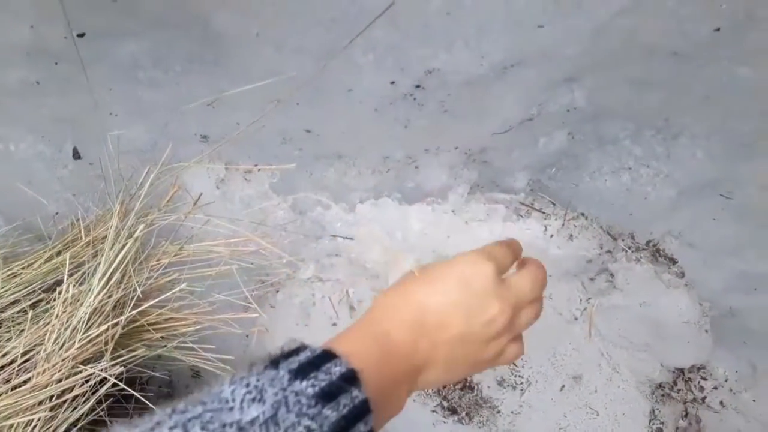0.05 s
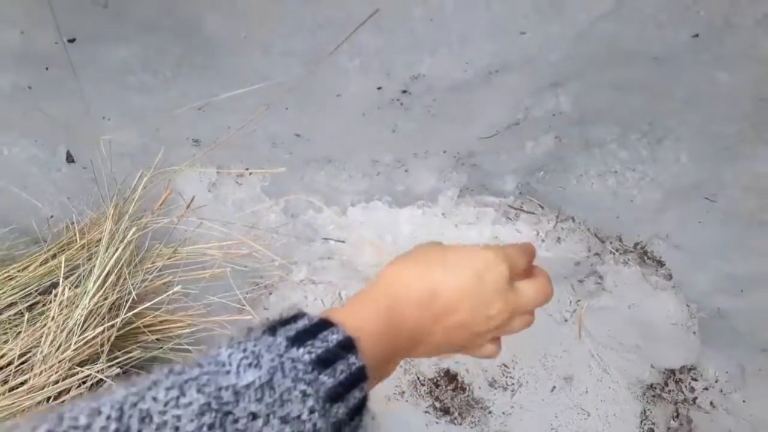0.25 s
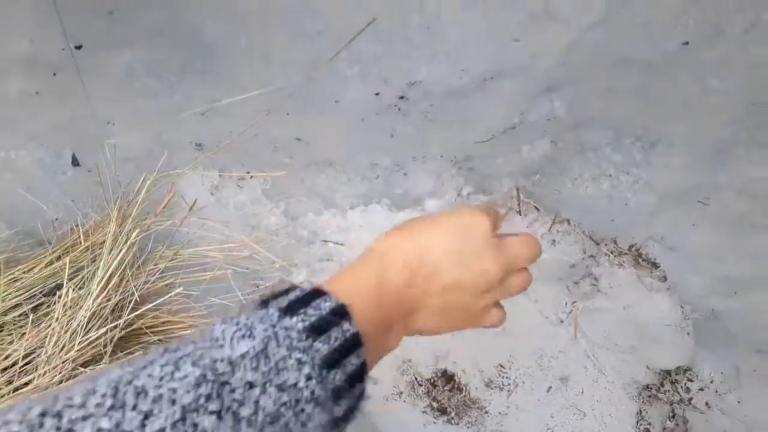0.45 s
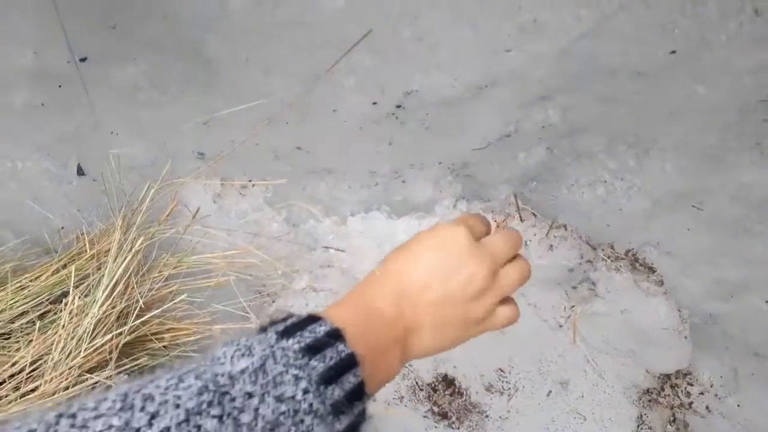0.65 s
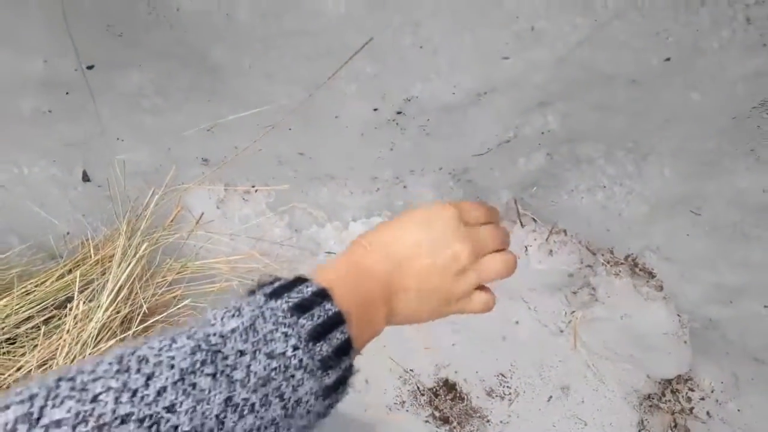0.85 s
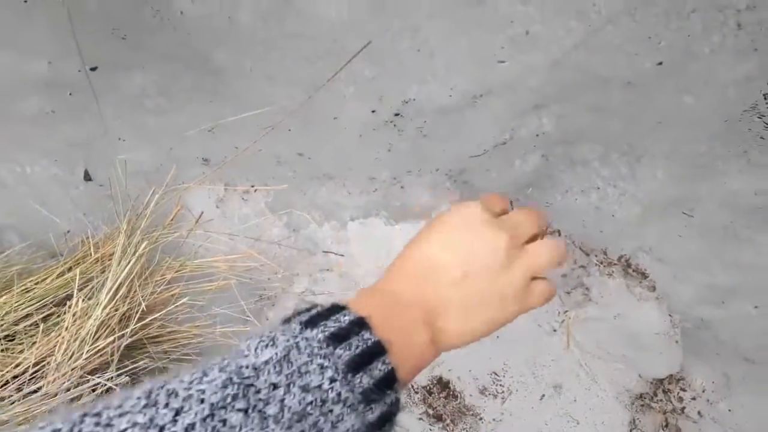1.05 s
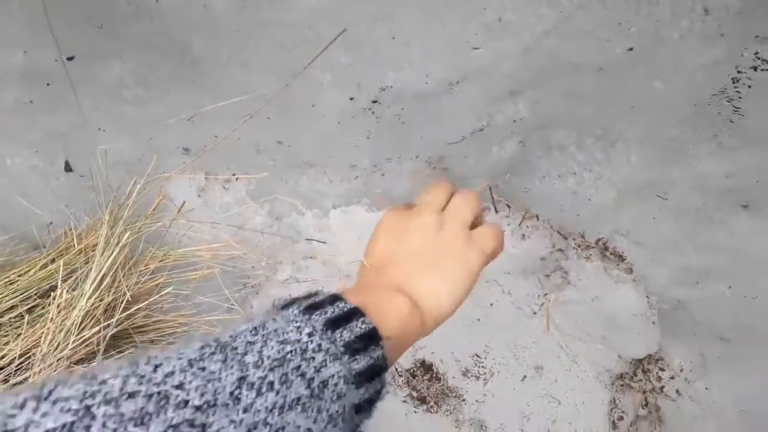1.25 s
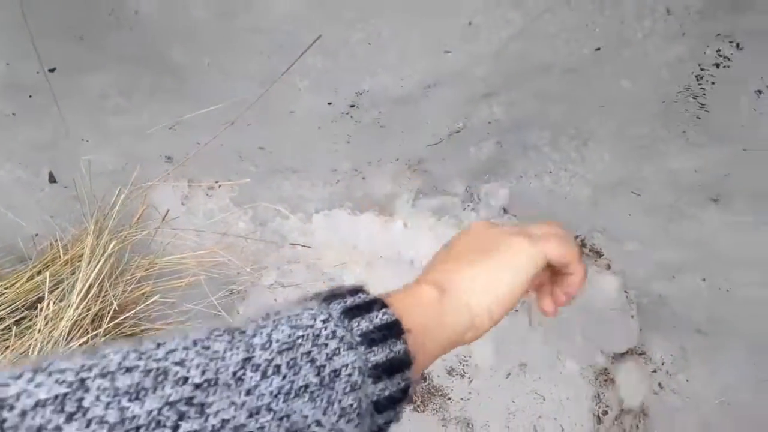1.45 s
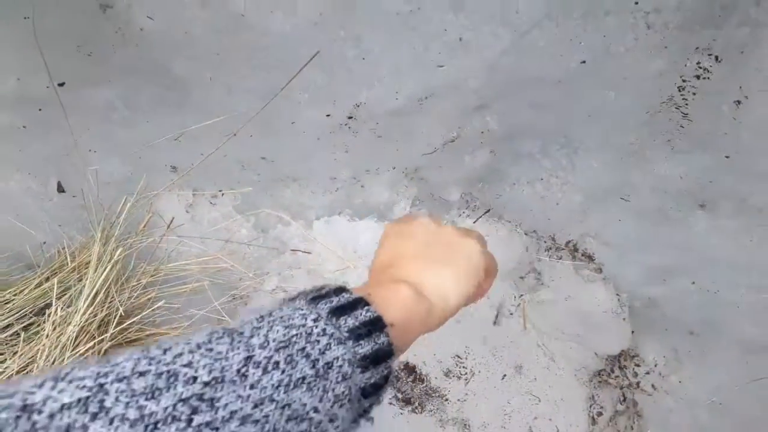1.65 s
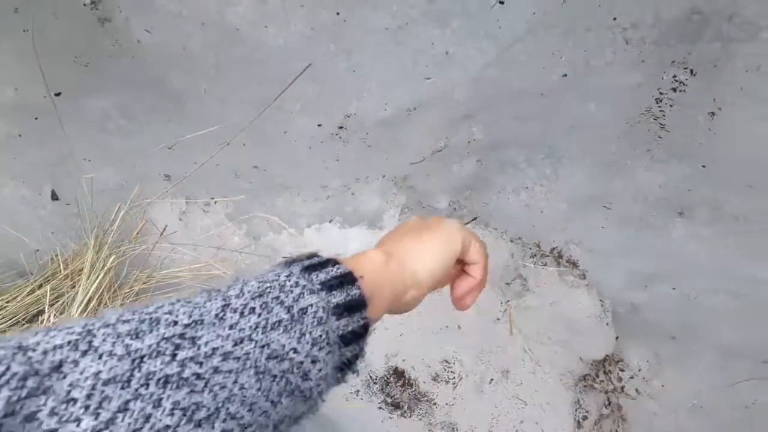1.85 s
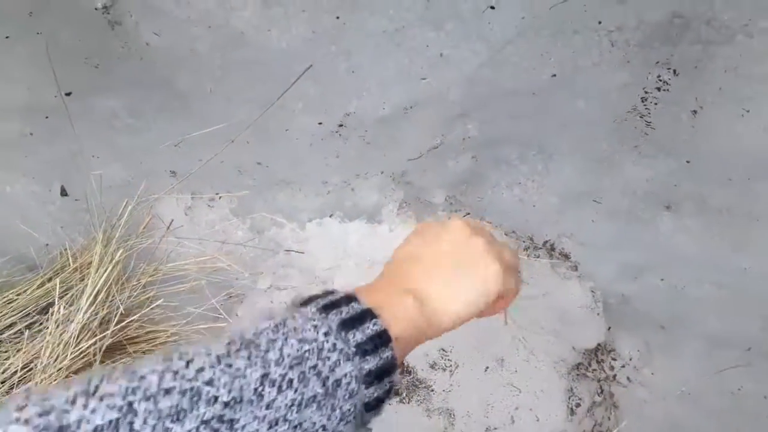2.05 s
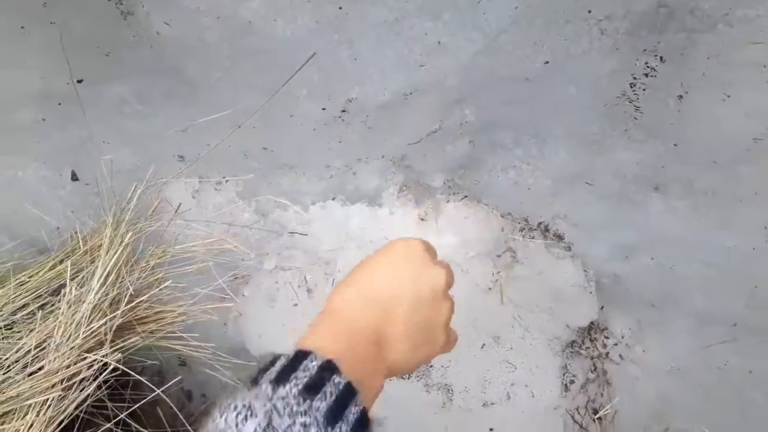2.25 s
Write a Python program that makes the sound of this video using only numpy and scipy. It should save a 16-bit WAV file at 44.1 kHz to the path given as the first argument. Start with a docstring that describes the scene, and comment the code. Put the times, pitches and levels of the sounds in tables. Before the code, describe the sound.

Brittle ice cracks under a hand in a few short, hollow crunches, with frosty scraping and small ticks of loose bits between them. The sound is close and outdoors, over faint wind that briefly brushes the microphone early on.

```python
"""A hand presses, breaks and scrapes the brittle crust at the edge of a sheet of ice, outdoors and close by.
Flakes snap, and the crust gives way in short, dull crunches that thud in the hollow below.
Strokes of the hand rasp as they break tiny frost crystals, and loose crumbs of ice tick.
Light wind rumbles underneath, with one puff on the microphone."""
import sys
import numpy as np
from scipy import signal
from scipy.fft import rfft, irfft, next_fast_len
from scipy.io import wavfile
from scipy.ndimage import uniform_filter1d, map_coordinates

SR = 44100
rng = np.random.default_rng(int(sys.argv[2]) if len(sys.argv) > 2 else 0)


def output_pcm(signal):
    """Save a mono or channel-first signal as 16-bit PCM at the path in sys.argv[1].

    Samples are clipped to [-1, 1] before scaling.
    """
    pcm = np.clip(np.atleast_2d(signal).T, -1, 1) * 32767
    wavfile.write(sys.argv[1], SR, np.round(pcm).astype(np.int16))


N = 105840
TIME = np.arange(N) / SR


def amp(db):
    """Turn decibels into a number to multiply a sound by."""
    return 10 ** (np.asarray(db) / 20)


def unit(x):
    """Scale a sound so that its average strength (rms) is 1."""
    return x / np.sqrt(np.mean(x ** 2) + 1e-20)


def fade(t, fade_s):
    """A fading curve; the fade time is how long it takes to drop by 60 dB."""
    return np.exp(-np.log(1000) * t / fade_s)


def resonance(f, hz, width):
    """How strongly something that rings at hz answers each frequency f."""
    return 1j * f * width / (hz * hz - f * f + 1j * f * width)


def filtered(x, response):
    """Turn each frequency of a sound up or down by response(frequency)."""
    size = next_fast_len(N + SR // 2)
    return irfft(rfft(x, size) * response(np.fft.rfftfreq(size, 1 / SR)), size)[..., :N]


def coloured(x, points, tilt_db=0, size=2048):
    """Give a sound the tone of (Hz, dB) points, brighter by tilt_db an octave, at strength 1."""
    hz, db = np.transpose(points)
    octave = np.log2(np.fft.rfftfreq(size, 1 / SR) + 1)
    curve_db = np.interp(octave, np.log2(hz), db) + tilt_db * np.maximum(octave - 10, -2)
    # build the filter so that it never sounds ahead of the hit that drives it
    cepstrum = irfft(np.log(amp(curve_db)))
    cepstrum[1:size // 2] *= 2
    cepstrum[size // 2 + 1:] = 0
    click_response = irfft(np.exp(rfft(cepstrum)))
    return unit(signal.oaconvolve(x, click_response)[:N])


def wobble(per_s):
    """A curve that slides to a new random value per_s times a second."""
    return map_coordinates(rng.standard_normal(N // 10), [TIME * per_s], order=1)


def grains(per_s, spread_db, hiss):
    """Tiny cracks of random size at random moments, over a smooth hiss."""
    hit = rng.random(N) < per_s / SR
    size = amp(spread_db * np.clip(rng.standard_normal(N), -2, 2))
    direction = np.sign(rng.standard_normal(N))
    return unit(unit(hit * size * direction) + hiss * rng.standard_normal(N))


def contacts(rows, grit, tone, release_s):
    """Each touch on the ice is a burst of grit that sets in, swells or fades, then lets go."""
    out = np.zeros(N)
    for start, length, rise, from_db, to_db, tilt_db in rows:
        t = TIME - start
        shape = np.clip(t / rise, 0, 1) * np.exp(-np.maximum(t - length, 0) / release_s)
        level = amp(np.interp(t, [0, length], [from_db, to_db]))
        out += shape * level * coloured(grit, tone, tilt_db)
    return out


def wind():
    """Faint air, a low rumble and one puff that swells on the microphone and dies away."""
    # the tone of each of the three (frequency [Hz], relative level [dB])
    air_tone = [(100, -13.5), (300, 2), (450, 0.5), (1000, 0.5), (2300, -11), (3200, -9), (5000, -12),
                (7000, -17.5), (8500, -14.5), (10500, -25), (14500, -16.5), (15800, -30)]
    rumble_tone = [(20, -8.5), (40, -6), (62, -6.5), (85, 2.5), (125, -5), (200, -4.5), (280, -11),
                   (400, -25.5), (900, -42)]
    puff_tone = [(20, -14), (45, -1), (70, 3), (125, 0), (180, -7.5), (300, -13), (700, -61.5)]
    peak_s, rise_s, fall_s = 0.58, 0.072, 0.049
    air = amp(-71 + 0.23 * wobble(9.7)) * coloured(rng.standard_normal(N), air_tone)
    rumble = amp(-65 + 0.97 * wobble(6.3)) * coloured(rng.standard_normal(N), rumble_tone, size=8192)
    swell = np.exp(np.minimum((TIME - peak_s) / rise_s, (peak_s - TIME) / fall_s))
    puff = amp(-47.5) * swell * coloured(rng.standard_normal(N), puff_tone, size=8192)
    return air + rumble + puff


def crumbs():
    """Loose bits of ice tick and rustle as they shift under the hand."""
    # how loud the crumbs are as time passes (time [s], level [dB])
    loudness = [(0, -70), (.18, -68.5), (.25, -68), (.39, -61.5), (.55, -63.5), (.72, -73.5), (.82, -67.5),
                (1.02, -72), (1.3, -68.5), (1.44, -69.5), (1.68, -58), (1.8, -69), (2.09, -57),
                (2.18, -67.5), (2.24, -58), (2.4, -64)]
    # their tone (frequency [Hz], relative level [dB])
    crumb_tone = [(200, -11.5), (600, -5.5), (1100, -4.5), (1800, -3), (2300, -2.5), (3000, -9.5),
                  (4300, -22.5), (7000, -17), (8700, -22), (10500, -32.5), (15000, -22)]
    level_db = np.interp(TIME, *np.transpose(loudness)) + 3.6 * wobble(60)
    return amp(level_db) * coloured(grains(per_s=1000, spread_db=1, hiss=0.51), crumb_tone)


def snapping():
    """A flake breaks: it rings briefly and sheds a bright spray of splinters."""
    # breaking flakes (time [s], level [dB], pitch [Hz], fade time [s], relative splinter level [dB])
    snaps = [(.1925, -43.5, 1620, 0.02, -12), (0.2059, -30.5, 1570, 0.0037, -23),
             (0.213, -31.5, 2250, 0.036, -36), (.307, -47, 2240, 0.023, -26), (.343, -50, 1490, 0.018, -18),
             (.382, -48.5, 2170, 0.019, -30), (.589, -37, 1570, 0.0081, 1.5), (.6, -37, 970, 0.021, -19),
             (0.628, -38, 1920, 0.011, 6.5), (0.671, -57, 1980, 0.0092, 11), (1.06, -49, 1940, 0.026, -2),
             (1.191, -45, 6870, 0.02, 4), (1.2155, -31.5, 1570, 0.012, -4),
             (1.3637, -23, 1560, 0.0046, -28), (1.365, -29, 1008, 0.028, -40),
             (1.3667, -20.5, 2280, 0.0022, -24.5), (1.3792, -46, 1640, 0.0065, -0.5),
             (1.52, -33.5, 5500, 0.01, -26), (1.562, -32, 5640, 0.0059, -15),
             (1.63, -34.5, 1298, 0.032, -1), (1.686, -44, 2180, 0.028, -4), (1.716, -48, 2050, 0.011, -1),
             (1.739, -57, 1800, 0.0076, -10), (1.8707, -38, 4600, 0.0082, 2),
             (1.881, -41, 6770, 0.016, -10), (1.9234, -23.5, 2440, 0.0047, -27),
             (1.931, -34.5, 1800, 0.014, -8), (1.967, -40, 7650, 0.017, 1.5), (1.9841, -37, 2920, 0.01, -2),
             (1.986, -37, 595, 0.02, -17), (2.0123, -37, 2630, 0.018, -2.5), (2.019, -37, 2530, 0.0089, -8),
             (2.0578, -26.5, 1920, 0.0053, -19.5), (2.129, -33.5, 1426, 0.014, -18),
             (2.23, -43.5, 3580, 0.0073, -10), (2.2952, -43.5, 2740, 0.01, 3)]
    # the tone of the spray (frequency [Hz], relative level [dB])
    splinter_tone = [(200, -36), (900, 10), (2500, 4.5), (4000, -2), (8500, 3), (11000, -10), (14500, -11),
                     (15800, -9.5)]
    ring_rise_s, spray_rise_s = 0.0001, 0.00046
    out = np.zeros(N + SR)
    t = np.arange(SR // 16) / SR
    sprays = np.resize(coloured(rng.standard_normal(N), splinter_tone), (len(snaps), len(t)))
    wavers = 0.43 * np.resize(wobble(1500), sprays.shape)  # makes each ring rough
    burst = amp(-4) * (1 - np.exp(-t / spray_rise_s)) * fade(t, fade_s=0.034)
    for (start, db, hz, fade_s, splinter_db), spray, waver in zip(snaps, sprays, wavers):
        ring = np.sin(2 * np.pi * hz * t + waver) * fade(t, fade_s) * (1 - np.exp(-t / ring_rise_s))
        out[round(start * SR):][:len(t)] += amp(db) * (ring + amp(splinter_db) * burst * spray)
    return out[:N]


def crunching():
    """The crust caves in with a quick run of coarse, dull cracks that make it ring."""
    # moments when the crust gives way (start [s], length [s], rise [s],
    # relative start level [dB], relative end level [dB], brightness [dB per octave])
    crunches = [(.2085, 0.019, 0.0064, -29.5, -33, 1), (1.37, 0.0066, 0.0015, -47, -38, 0.5),
                (1.38, .011, .002, -44.5, -40.5, 1.5), (1.921, .019, 0.00095, -40.5, -41, -1.8),
                (1.984, 0.0096, .001, -51, -49.5, 0.8), (2.12, 0.016, 0.0025, -42, -47, 2.5)]
    # the tone of the cracks (frequency [Hz], relative level [dB])
    crust_tone = [(30, -36), (100, -23.5), (230, -1), (520, -13), (1000, -2.5), (1350, 0.5), (1700, 1.5),
                  (2600, -3), (3100, -5), (4000, -15.5), (4800, -9), (5300, -20.5), (8600, -18.5),
                  (9500, -41), (11000, -41), (15800, -56)]
    # the pitches at which the crust rings (pitch [Hz], width [Hz], gain [dB])
    rings = [(410, 57, 0.5), (686, 150, 1.5), (842, 98, 0), (1036, 134, -2), (1770, 95, -6.5),
             (2365, 270, -3.5), (2614, 78, -0.5)]
    grit = grains(per_s=5000, spread_db=0.5, hiss=0.14)
    cracks = contacts(crunches, grit, crust_tone, release_s=0.0012)
    direct = amp(-5.5)  # the share that does not ring
    return filtered(cracks, lambda f: direct + sum(
        amp(db) * resonance(f, hz, width) for hz, width, db in rings))


def thudding():
    """The hollow under the crust answers each blow with a few low, short notes."""
    # weight lands on the hollow ice (time [s], relative level [dB])
    thuds = [(0.218, -34.5), (0.2257, -28), (1.3842, -36), (1.389, -58), (1.923, -39), (1.9375, -38),
             (1.986, -51), (2.123, -44)]
    # the notes of the hollow (pitch [Hz], relative level [dB], fade time [s])
    notes = [(263.7, -1.5, 0.035), (413, -7, 0.022), (700, -16, 0.032), (867, 2.5, 0.02), (1000, -9, 0.016)]
    rise_s = 0.0013
    out = np.zeros(N + SR)
    t = np.arange(SR // 10) / SR
    ring = sum(amp(db) * np.sin(2 * np.pi * hz * t) * fade(t, fade_s) for hz, db, fade_s in notes)
    for start, db in thuds:
        out[round(start * SR):][:len(t)] += amp(db) * ring * (1 - np.exp(-t / rise_s))
    return out[:N]


def chips(count=3000, per_s=1400, low_hz=1212, high_hz=15040, ring_cycles=4.4, spread_db=2):
    """Tiny chips of ice ping, each at its own pitch for a few cycles."""
    starts = rng.random(count) * count / per_s
    hz = low_hz * (high_hz / low_hz) ** rng.random((count, 1))
    size = amp(spread_db * np.clip(rng.standard_normal((count, 1)), -2, 2))
    samples = np.arange(SR // 150)
    cycles = hz * samples / SR
    pings = size * hz * np.sin(2 * np.pi * cycles) * np.exp(-cycles / ring_cycles)
    places = (starts * SR).astype(int)[:, None] + samples
    return unit(np.bincount(places.ravel(), pings.ravel(), N)[:N])  # add each ping at its place


def scraping():
    """The hand drags over frost: crystals break in clumps and throw off chips, with a thin hiss."""
    # strokes of the hand (start [s], length [s], rise [s],
    # start level [dB], end level [dB], brightness [dB per octave])
    strokes = [(.434, 0.078, 0.0084, -56, -72, 3.5), (.546, 0.026, 0.0052, -58, -57.5, 0),
               (.567, 0.062, 0.0028, -46, -43.5, -0.5), (.632, 0.14, 0.0041, -58, -65, 0),
               (.92, 0.04, 0.0026, -50.5, -59, -1), (.984, 0.072, 0.014, -56, -61, -1),
               (1.087, 0.036, .002, -62, -44.5, -2), (1.125, 0.089, 0.0011, -46, -61, -0.3),
               (1.207, 0.01, 0.0035, -37, -43.5, 13), (1.457, 0.064, 0.0032, -54, -45, 0.1),
               (1.543, 0.021, 0.0067, -46, -48.5, -0.9), (1.562, 0.05, 0.0033, -45.5, -39, 0.75),
               (1.617, 0.034, 0.0017, -56.5, -56.5, 1.5), (1.705, 0.011, 0.0024, -54, -55.5, 3.5),
               (1.739, 0.062, 0.0018, -53.5, -62, 0), (1.816, 0.038, 0.0035, -56.5, -51.5, -1.2),
               (1.87, 0.016, 0.003, -51, -53.5, 1.2), (1.898, .045, 0.0041, -47, -46, -2.5),
               (1.964, 0.11, 0.0066, -57.5, -59.5, 1), (2.074, 0.039, 0.009, -51, -55, -0.4),
               (2.119, 0.044, 0.0024, -43.5, -63.5, -0.2), (2.21, 0.054, 0.0031, -49, -64, 1.7),
               (2.265, 0.076, 0.011, -63, -64.5, 0)]
    # the tone of the frost (frequency [Hz], relative level [dB])
    frost_tone = [(150, -11), (450, -10.5), (640, -5), (850, 2.5), (1300, 0), (1900, -0.5), (2500, -7),
                  (3200, -6), (5600, -7), (7400, -5), (8900, -8), (10000, -16.5), (11300, -23.5),
                  (14400, -10), (15800, -10.5)]
    crystals = grains(per_s=6000, spread_db=1, hiss=0.43)
    clumps = amp(1.35 * wobble(220))
    grit = crystals * clumps + amp(-3) * chips()
    rasp = contacts(strokes, grit, frost_tone, release_s=0.0084)
    effort = np.sqrt(np.abs(uniform_filter1d(rasp ** 2, size=1500)))
    rubbing = filtered(rng.standard_normal(N), lambda f: resonance(f, hz=8760, width=1000) ** 2)
    return rasp + amp(-74) * unit(rubbing * effort ** 0.35)  # the hiss grows more slowly than the rasp


def echo(x):
    """The ground and the bank scatter back a weak, short echo."""
    t = np.arange(SR // 3) / SR
    tail = rng.standard_normal(len(t)) * fade(t, fade_s=0.16)
    return amp(-28.5) * signal.fftconvolve(x, tail / np.linalg.norm(tail))[:N]


def scene():
    """The ice lies straight ahead; only its echo spreads a little to the left and right."""
    ice = scraping() + crunching() + snapping() + thudding() + crumbs()
    middle = ice + echo(ice) + wind()
    side = amp(-28.5) * echo(ice)
    return np.array([middle + side, middle - side])


def record(dry):
    """The microphone thins the deep bass and cuts off the very highest treble."""
    low_cut_hz, top_hz = 34, 15900
    thinned = filtered(dry, lambda hz: (1j * hz / (low_cut_hz + 1j * hz)) ** 2)
    return filtered(thinned, lambda hz: np.clip((top_hz - hz) / 200 + .5, 0, 1))


dry = scene()
out = record(dry)
output_pcm(out)
```